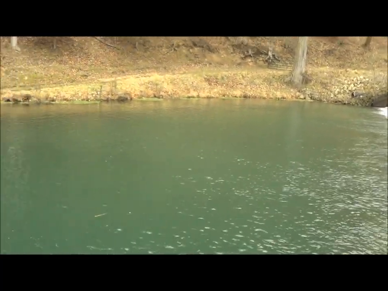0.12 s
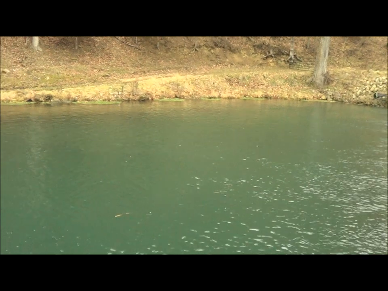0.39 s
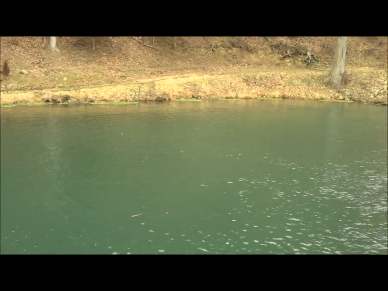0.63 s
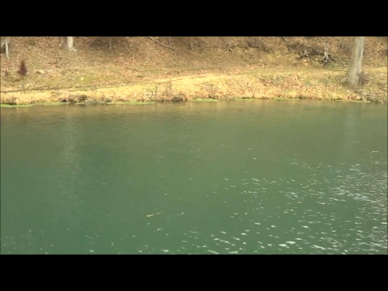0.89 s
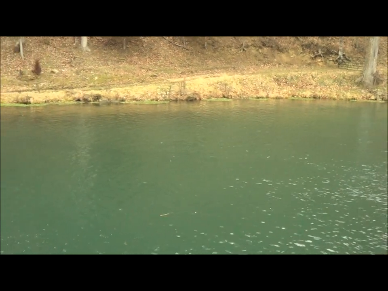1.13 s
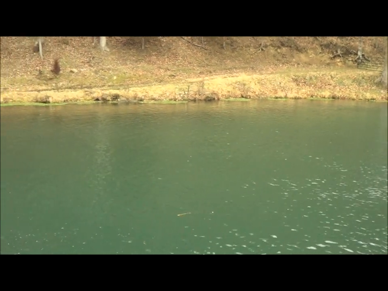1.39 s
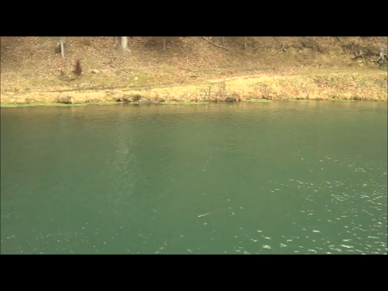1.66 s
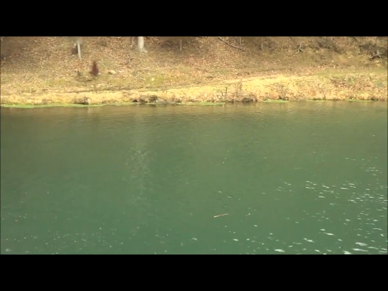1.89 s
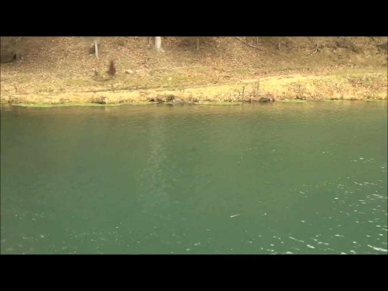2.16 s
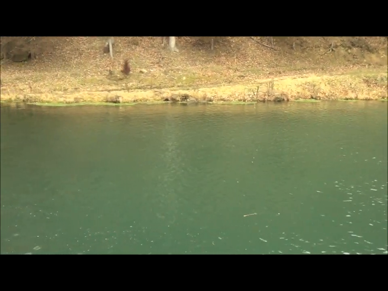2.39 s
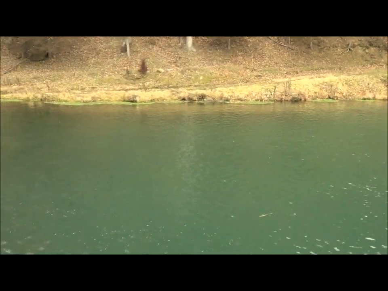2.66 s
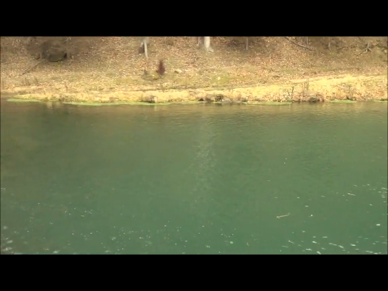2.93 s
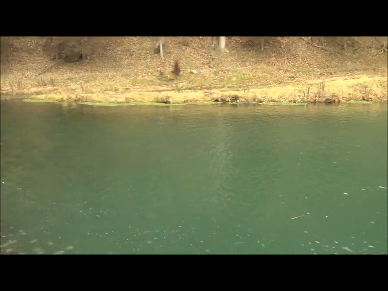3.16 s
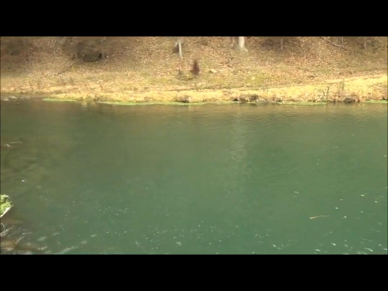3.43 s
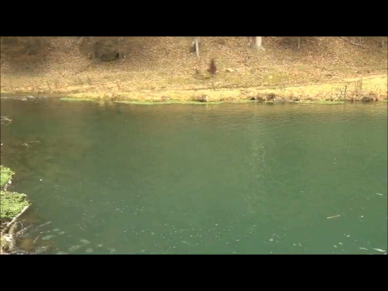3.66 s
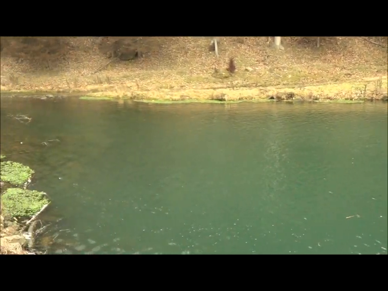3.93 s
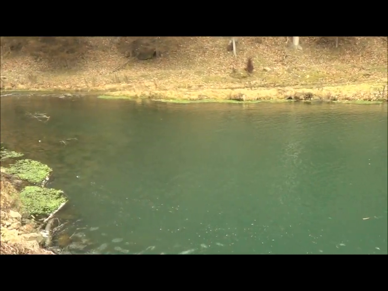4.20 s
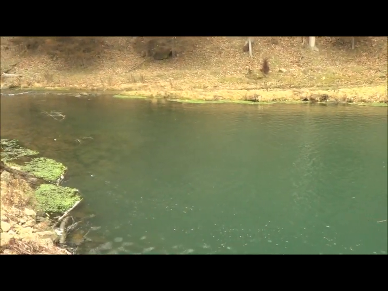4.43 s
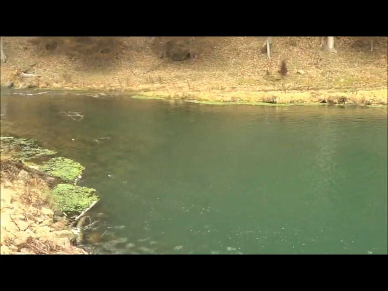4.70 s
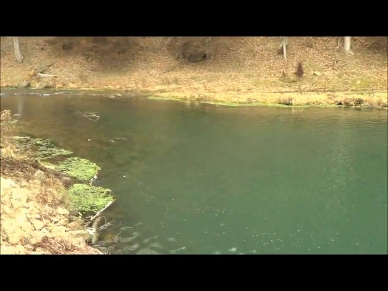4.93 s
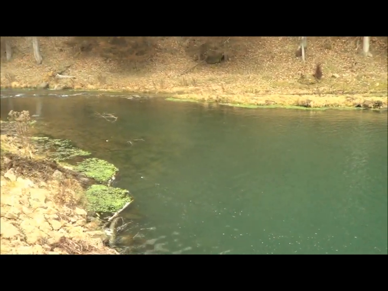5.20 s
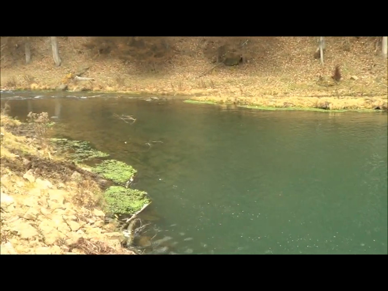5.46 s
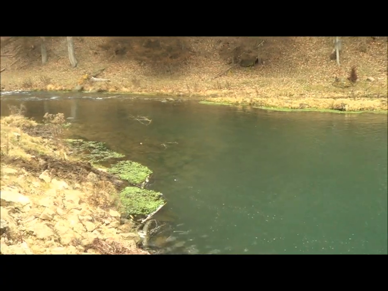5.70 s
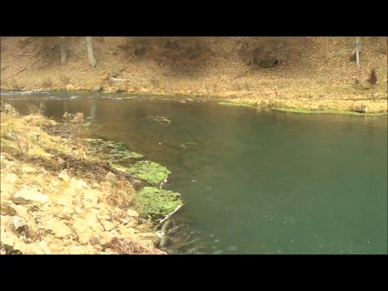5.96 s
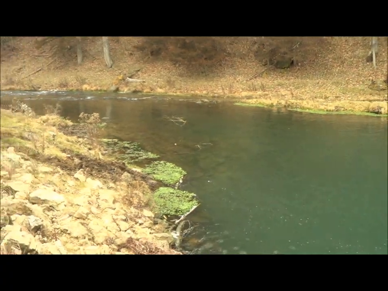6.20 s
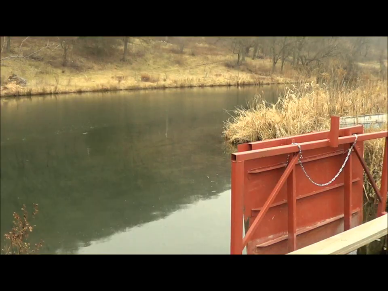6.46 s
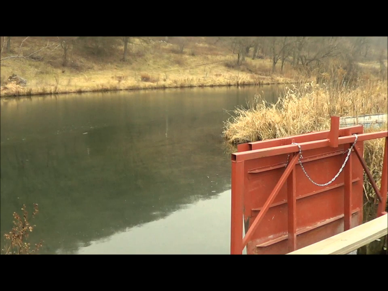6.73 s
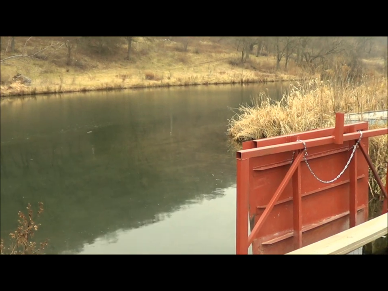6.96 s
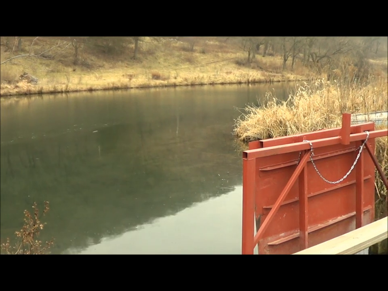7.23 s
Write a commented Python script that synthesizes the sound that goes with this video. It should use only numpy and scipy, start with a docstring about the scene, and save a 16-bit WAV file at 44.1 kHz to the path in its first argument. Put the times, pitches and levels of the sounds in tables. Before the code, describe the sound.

Water roars over a low dam, wind rumbling at the microphone; it stops dead, and a fainter, muffled flow follows with small plastic clicks.

```python
"""Low dam spillway: falling water rushes close by while a hand-held stereo microphone turns slowly away.
The rush is shaped noise combed by a reflection; wind eddies add low noise delayed between two ports.
After a short silence a calmer spot above the dam follows: a duller, off-centre noise field for the fall,
with a few handling ticks made of ringing sines, cracks and thumps. A thin steady sine whines in both
passages, and a gain control holds down the loud moments."""
import sys
import numpy as np
from scipy import signal
from scipy.io import wavfile
from scipy.ndimage import uniform_filter1d

SR = 44100
rng = np.random.default_rng(int(sys.argv[2]) if len(sys.argv) > 2 else 0)


def amplitude_ratio(level_db):
    """Convert a level in decibels to the matching linear amplitude (field) ratio."""
    exponent = np.asarray(level_db, float) / 20
    return 10 ** exponent


def generate_wav(signal):
    """Clip the signal to [-1, 1] and save it as 16-bit WAV at the path in sys.argv[1]."""
    frames = np.transpose(np.atleast_2d(signal))
    scaled = np.clip(frames, -1, 1) * 32767
    pcm = np.round(scaled).astype(np.int16)
    wavfile.write(sys.argv[1], SR, pcm)


N = 324135

# Spectral shape of the near rush: (frequency [Hz], relative density [dB per Hz])
SPRAY_SPECTRUM = [(40, -47.5), (110, -14.5), (250, -5.5), (500, -0.5), (950, 3.5), (1350, 1), (1900, 3.5),
                  (2600, 1), (4200, 0), (6300, -1.5), (9000, 1), (11000, -3), (13000, -11), (15500, -18.5)]
# Head-shadow-like balance of the housing: (frequency [Hz], share of the left-right difference [1])
HOUSING_SHADOW = [(300, .1), (1000, .45), (2300, .5), (4400, 1.1), (8000, 1.1), (15000, .5)]
# Phase between the ports for the near rush: (frequency [Hz], lead of left [rad])
SPRAY_PHASE = [(600, .5), (1400, .1), (3500, .3), (5800, -.1), (7200, .5), (9500, 0)]
# Extra decorrelation by scattering: (frequency [Hz], factor on the scattered share [1])
SCATTER_FACTOR = [(100, 2.5), (300, 1.4), (700, 0.86), (7000, 1.3), (10000, 0.75), (15000, .8)]
# Directness of the near rush: (time [s], share arriving straight [0-1])
STRAIGHT_SHARE = [(0, 0.9), (1, 0.85), (2.2, .73), (2.7, .83), (3.3, 0.85), (5.1, .64), (5.7, .83),
                  (6.3, 0.8)]
# Wind ahead of the gain control: (time [s], level [dB])
GUST_LEVEL = [(0.05, -27.5), (.47, -30), (.6, -16), (.66, -21), (.74, -14), (.83, -16), (.9, -10),
              (1.25, -11), (1.5, -9), (2.1, -8.5), (2.45, -9), (2.9, -7), (3.15, -1), (3.42, -2.5),
              (3.8, -2), (4.5, 1.5), (4.75, 1), (5.0, -1.5), (5.35, 2), (5.7, -1), (6.0, -4.5), (6.1, -1),
              (6.2, -4.5), (6.3, -4.5)]
# Turbulence spectrum at unit eddy speed: (frequency [Hz], relative density [dB per Hz])
EDDY_SPECTRUM = [(100, -2.5), (300, -0.24), (480, -3.5), (600, -6), (1000, -12), (2000, -22), (4000, -48)]
# Microphone response to wind: (frequency [Hz], gain [dB])
WIND_RESPONSE = [(20, -35), (50, -43.5), (100, -9), (170, -2.5), (260, 0.4)]
# Eddies passing from left port to right: (time [s], delay [ms], likeness of large eddies [0-1],
# frequency where small eddies have broken up [Hz])
EDDY_CROSSING = [(0, 0.79, 0.36, 1000), (.8, .62, 1, 1700), (2.7, 0.52, 0.84, 1700), (3.1, .45, 0.75, 2600),
                 (5, .45, 0.77, 2600), (5.8, -0.16, 0.52, 700), (6.3, 0.48, 0.52, 1400)]
# Spectral shape of the far rush: (frequency [Hz], relative density [dB per Hz])
FAR_SPECTRUM = [(18, -61), (30, -30.5), (561, -11), (673, -12), (945, -9.5), (1290, -10.5), (1440, -11),
                (1680, -8.5), (1870, -12.5), (2990, -14.5), (6050, -25), (8950, -22.5), (12900, -32.5),
                (15500, -38)]
# Coherence of the far rush: (frequency [Hz], left-right likeness [0-1])
FAR_LIKENESS = [(60, 0.79), (120, 0.89), (240, 0.94), (480, 1), (950, 0.86), (1890, 0.74), (3770, 0.44),
                (7520, 0.29), (15000, 0.78)]
# Balance of the far rush: (frequency [Hz], left minus right [dB])
FAR_BALANCE = [(60, 1), (120, 1), (240, 1), (480, 1), (950, 5.5), (1890, 5.0), (3770, 9.5), (7520, -0.5),
               (15000, -5.5)]
# Phase between the ports for the far rush: (frequency [Hz], lead of left [rad])
FAR_PHASE = [(1100, .3), (1400, -.1), (2300, .1), (4800, 1.2), (5500, .8), (7000, -1.1), (8600, -.9),
             (11800, 0)]
# Handling ticks: (time [s], level [dB], ring frequency [Hz], left minus right [dB], thump level [dB])
HANDLING_TICKS = [(6.9928, -15, 3550, 3.5, -38), (7.0455, -13, 2260, 2.5, -23), (7.056, -18, 3170, 3, -33),
                  (7.061, -13, 3960, 4.5, -32), (7.0765, -20, 2590, 3, -38)]

# Short-time spectra: step and window [samples], frame times [s], bin frequencies [Hz]
HOP, SIZE = 256, 1024
T = np.arange(N // HOP + 5) * HOP / SR
HZ = np.fft.rfftfreq(SIZE, 1 / SR)[:, None]
EDGE_HZ = 15900  # upper limit of the noise fields

STOP_S, START_S, FADE_S = 6.301, 6.797, .022  # near spot ends, far spot starts, slope of its fade

# Near rush; pairs run from the start to the end of the turn
FALL_DB = -7  # 2.5-12 kHz, ahead of the patches and the gain control
LOST_DB = (0, 4.5)  # limit of the treble loss behind the housing
LEFT_DB = (-5, -4)  # left minus right, ahead of the housing shadow
ALIKE_HZ = (1950, 2770)  # its multiples reach both ports more alike

# Reflection off the holder's hand or body: first and final delay [ms], settling time [s]
BOUNCE_MS, BOUNCE_SETTLE_S = (1.07, .86), 2.4
BOUNCE_GAINS = (.39, .34)  # greatest, left and right
BOUNCE_TOP_S, BOUNCE_RISE_S, BOUNCE_GONE_S = 3.6, 3.6, 1.4

# Wind: above BRISK_DB the eddies run faster and moan more over the port edges
MOAN_HZ, MOAN_WIDTH_HZ = 440, 65  # at unit eddy speed
BRISK_DB, CALM_SPEED, SPEED_PER_DB = -4.5, 0.76, 0.0634
CALM_MOAN_DB, MOAN_PER_DB = 1.4, 0.73
# Slow pressure lumps: level per bin at 0 dB of gust, roll-off, share of the gust dB they follow
FLUTTER_DB, FLUTTER_HZ, FLUTTER_SHARE = -39, 45, .5

FAR_DB, FAR_SWELL_DB_PER_S = -27.5, 2  # 300-5000 Hz, at START_S
WHINE_HZ, WHINE_DB = 15734.26, -52  # rms level ahead of the gain control

# Gain control: threshold, ratio, averaging time, fall rate of the sensed level
KNEE_DB, RATIO, SENSE_S, SENSED_FALL_DB_PER_S = -14.65, 5.5, .011, 12


def evened(x):
    """Normalisation: scales a field to rms 1."""
    return x / np.sqrt(np.mean(abs(x) ** 2) + 1e-20)


def read(points, hz):
    """Spectral interpolation on a logarithmic frequency axis."""
    f, value = np.transpose(points)
    return np.interp(np.log(hz + 1), np.log(f + 1), value)


def curves(rows):
    """Linear interpolation in time: each column at the frame times."""
    s, *columns = np.transpose(rows)
    return [np.interp(T, s, column) for column in columns]


def turned(ends):
    """Uniform rotation: a value moves evenly from one end of the turn to the other."""
    return ends[0] + (ends[1] - ends[0]) * np.minimum(T / STOP_S, 1)


def chance():
    """Random-phase superposition: complex Gaussian noise, one value per bin and frame."""
    a, b = rng.standard_normal((len(T), len(HZ), 2)).T
    return (a + 1j * b) / np.sqrt(2)


def lumps(ms, hz):
    """Local averaging: noise smoothed into random patches of about ms by hz, rms 1."""
    frames = max(1, round(ms / 1000 * SR / HOP))
    bins = max(1, round(hz * SIZE / SR))
    field = uniform_filter1d(chance().real, frames, 1)
    return evened(uniform_filter1d(field, bins, 0))


def levelled(shape, db, lo_hz, hi_hz):
    """Band power summation: scales each frame so that a band of the field has the given level."""
    inside = (HZ >= lo_hz) & (HZ < hi_hz)
    return shape * amplitude_ratio(db) / np.sqrt((inside * shape ** 2).sum(0))


def sounded(left, right):
    """Overlap-add synthesis: summed bin power becomes the signal power of each channel."""
    z = np.array([left, right]) * np.sqrt(3) * (HZ < EDGE_HZ)
    return signal.istft(z, nperseg=SIZE, noverlap=SIZE - HOP)[1][:, :N]


def pair(shape, same, lead, left_db, paths=(1, 1)):
    """Partial coherence: a shared part and a scattered part per port, with phase lead and balance."""
    same = np.clip(same, 0, 1)
    shared = np.sqrt(same) * chance()
    scattered = np.sqrt(1 - same)
    turn = amplitude_ratio(left_db / 2) * np.exp(1j * lead / 2)
    # rms of the half-sum of both ports, so that shape describes that half-sum
    mid = np.sqrt((abs(turn) ** 2 + abs(turn) ** -2 + 2 * same * np.cos(lead)) / 4)
    left, right = (shape / mid * (path * shared + scattered * chance()) for path in paths)
    return sounded(left * turn, right / turn)


def reflected_paths():
    """Comb filtering: a delayed, band-limited reflection adds to the straight path at each port."""
    ms = BOUNCE_MS[1] + (BOUNCE_MS[0] - BOUNCE_MS[1]) * np.exp(-T / BOUNCE_SETTLE_S)
    spread_s = np.where(T < BOUNCE_TOP_S, BOUNCE_RISE_S, BOUNCE_GONE_S)
    arch = np.exp(-((T - BOUNCE_TOP_S) / spread_s) ** 2)
    late = np.exp(-2j * np.pi * HZ * ms / 1000)
    late = late / (1 + (HZ / 5800) ** 6) / (1 + (1300 / (HZ + 1)) ** 4)
    return [1 + gain * arch * late for gain in BOUNCE_GAINS]


def falling_water():
    """Incoherent summation: countless bursting bubbles merge into a patchy rush of noise."""
    left_db, straight = turned(LEFT_DB), curves(STRAIGHT_SHARE)[0]
    # lows bend round the housing, so chiefly the treble is lost
    lost_db = turned(LOST_DB) / (1 + (6500 / (HZ + 1)) ** 3)
    shape = levelled(amplitude_ratio(read(SPRAY_SPECTRUM, HZ) - lost_db), FALL_DB, 2500, 12000)
    patches_db = .5 * lumps(60, 600) + 0.69 * lumps(12, 9800) + 0.37 * lumps(90, 9000)
    alike = .75 * np.cos(2 * np.pi * HZ / turned(ALIKE_HZ)) / (1 + (HZ / 6000) ** 4)
    apart = (1 - straight) * (1 - alike) * read(SCATTER_FACTOR, HZ)
    lead = read(SPRAY_PHASE, HZ) * (1 - alike)
    balance_db = left_db * read(HOUSING_SHADOW, HZ) * (1 - .4 * alike)
    return pair(shape * amplitude_ratio(patches_db), 1 - apart, lead, balance_db, reflected_paths())


def wind():
    """Convected turbulence: eddies pass one port, then the other; small ones break up on the way."""
    ms, like, apart_hz = curves(EDDY_CROSSING)
    gust_db = curves(GUST_LEVEL)[0]
    brisk_db = np.maximum(gust_db - BRISK_DB, 0)
    speed = CALM_SPEED + SPEED_PER_DB * brisk_db
    moan_db = CALM_MOAN_DB + MOAN_PER_DB * brisk_db
    hz = HZ / np.clip(speed, .3, 3)  # faster eddies shift the spectrum upward
    moan = moan_db * np.exp(-((hz - MOAN_HZ) / MOAN_WIDTH_HZ) ** 2)
    colour = amplitude_ratio(read(EDDY_SPECTRUM, hz) + moan + read(WIND_RESPONSE, HZ))
    shape = levelled(colour, gust_db, 120, 600)
    shape = shape * amplitude_ratio(0.55 * lumps(40, 500) + 0.8 * lumps(130, 400))
    same = like * np.exp(-(HZ / apart_hz) ** 2) / (1 + (40 / (HZ + 1)) ** 3)
    # the phase lead levels off toward higher frequencies, where the water's rush mixes in
    lead = 2.1 * np.tanh(2 * np.pi * HZ * ms / 1000 / 2.1)
    return pair(shape, same, lead, -.25) + flutter(gust_db)


def flutter(gust_db):
    """Local pressure fluctuation: slow lumps of low noise, unrelated in the two ports."""
    level_db = FLUTTER_DB + FLUTTER_SHARE * gust_db + 2.8 * lumps(120, 200)
    return pair(amplitude_ratio(level_db) * np.exp(-(HZ / FLUTTER_HZ) ** 2), 0, 0, 0)


def far_water():
    """Partly diffuse field: the same fall from above the dam, duller and off to the left."""
    level_db = FAR_DB + FAR_SWELL_DB_PER_S * (T - START_S)
    shape = levelled(amplitude_ratio(read(FAR_SPECTRUM, HZ)), level_db, 300, 5000)
    shape = shape * amplitude_ratio(0.54 * lumps(50, 700))
    return pair(shape, read(FAR_LIKENESS, HZ), read(FAR_PHASE, HZ), read(FAR_BALANCE, HZ))


def ticks():
    """Damped resonance: plastic creaks as a dull crack, a short ring and a low thump in the housing."""
    out = np.zeros((2, N))
    t = np.arange(1500) / SR
    band = signal.butter(2, [1300, 8000], "band", fs=SR)
    cracks = signal.lfilter(*band, rng.standard_normal((len(HANDLING_TICKS), len(t))))
    onset = 1 - np.exp(-t / .0003)
    for (s, db, hz, left_db, thump_db), crack in zip(HANDLING_TICKS, cracks):
        # each part decays 60 dB in the time that divides t
        ring = .6 * np.sin(2 * np.pi * hz * t) * amplitude_ratio(-60 * t / .02)
        creak = amplitude_ratio(db) * (ring + 1.3 * crack * amplitude_ratio(-60 * t / .018)) * onset
        thump = amplitude_ratio(thump_db - 60 * t / 0.063) * np.sin(2 * np.pi * 335 * t)
        at = round(s * SR)
        out[:, at:at + len(t)] += creak * amplitude_ratio([[left_db / 2], [-left_db / 2]]) + thump
    return out


def whine(t):
    """Pure tone: a line-scan whine leaks from the electronics as a steady sine, absent in the silence."""
    running = (t < STOP_S) | (t > START_S)
    return np.sqrt(2) * amplitude_ratio(WHINE_DB) * np.sin(2 * np.pi * WHINE_HZ * t) * running


def held_down(x):
    """Dynamic range compression: gain is quick to fall on loud moments, slow to recover."""
    keep = np.exp(-1 / (SENSE_S * SR))
    power = (x ** 2).mean(0)
    settled = [keep * power[:SIZE].mean()]  # the sensing starts already settled
    sensed = signal.lfilter([1 - keep], [1, -keep], power, zi=settled)[0]
    power_db = 10 * np.log10(sensed + 1e-12)
    fall = np.arange(x.shape[1]) * SENSED_FALL_DB_PER_S / SR
    peak_db = np.maximum.accumulate(power_db + fall) - fall
    over_db = np.maximum(peak_db - KNEE_DB, 0)
    return x / amplitude_ratio(over_db * (1 - 1 / RATIO))


def scene():
    """Linear superposition of sources: the near spot, silence, then the far spot."""
    t = np.arange(N) / SR
    near = (falling_water() + wind()) * (t < STOP_S)
    fade = np.clip((t - START_S) / FADE_S + 0.16, 0, 1) * (t > START_S)
    far = (far_water() + ticks()) * fade
    return near + far


def top_cut(x):
    """Nothing passes above the cut-off."""
    return signal.sosfilt(signal.butter(12, 16490, fs=SR, output="sos"), x)


def record(dry):
    """Amplitude limiting: the whine joins, gain control holds each passage down, and peaks clip."""
    t = np.arange(N) / SR
    passages = np.split(dry + whine(t), [round(START_S * SR)], axis=1)
    held = np.hstack([held_down(passage) for passage in passages])
    return top_cut(np.clip(held, -1, 1))


dry = scene()
out = record(dry)
generate_wav(out)
```